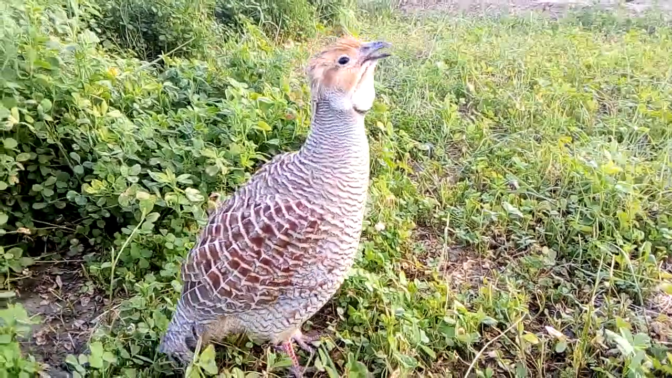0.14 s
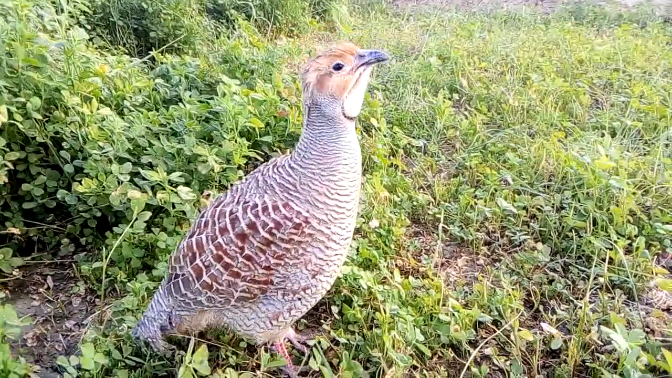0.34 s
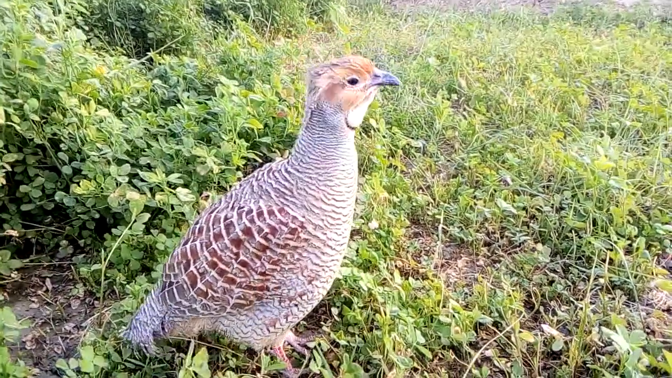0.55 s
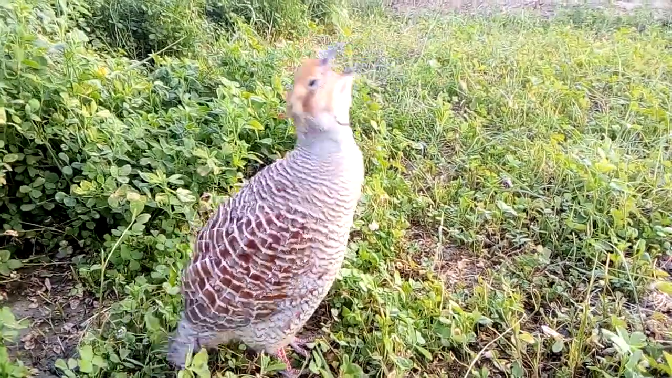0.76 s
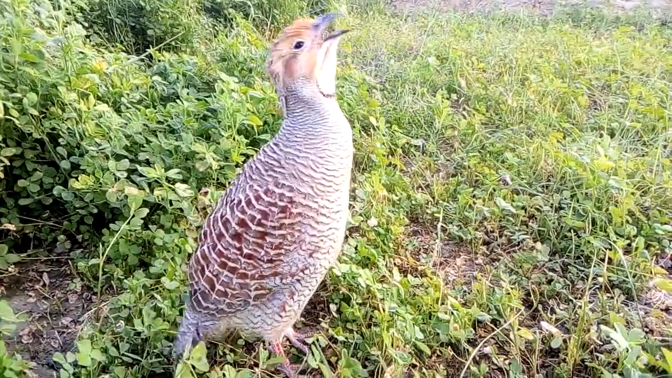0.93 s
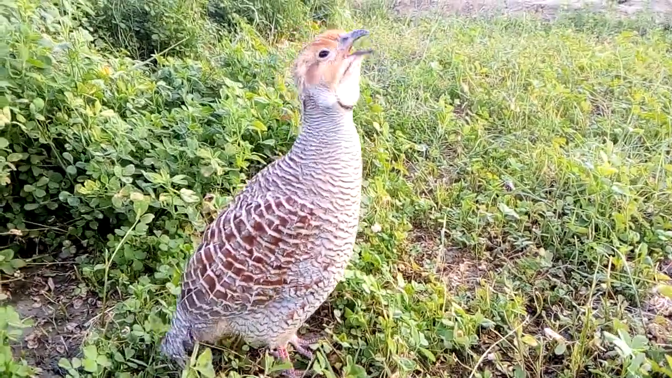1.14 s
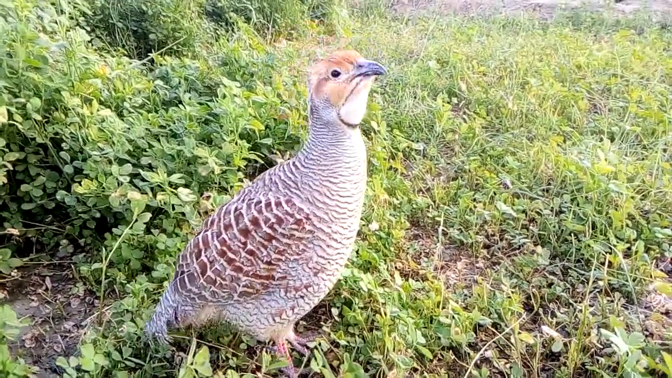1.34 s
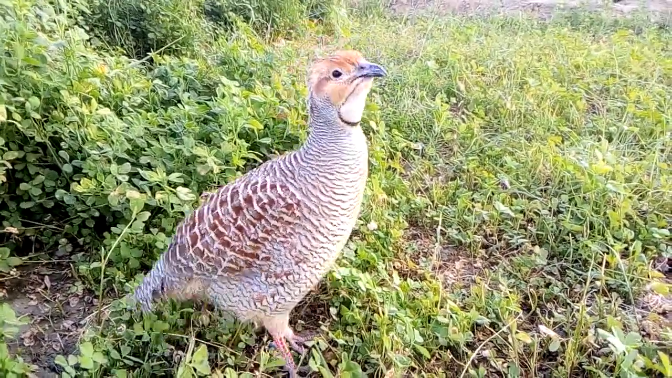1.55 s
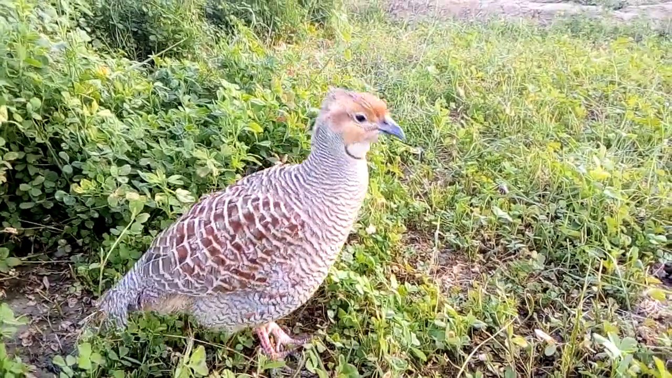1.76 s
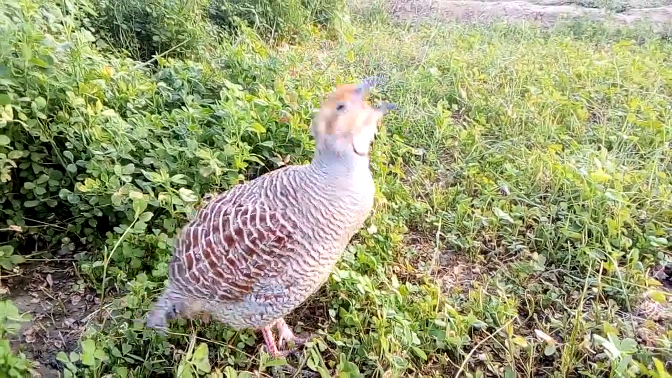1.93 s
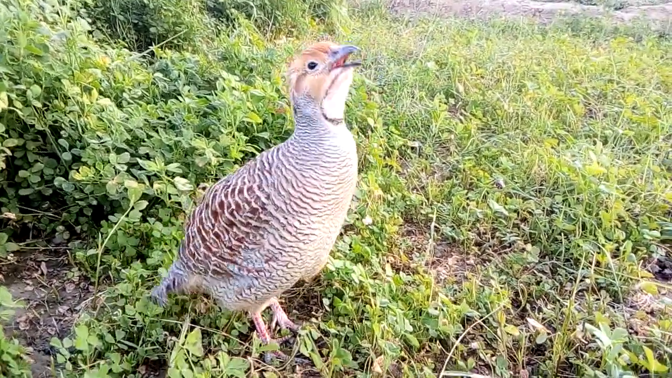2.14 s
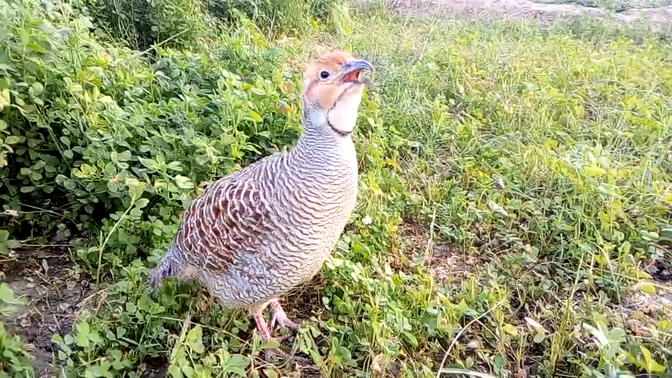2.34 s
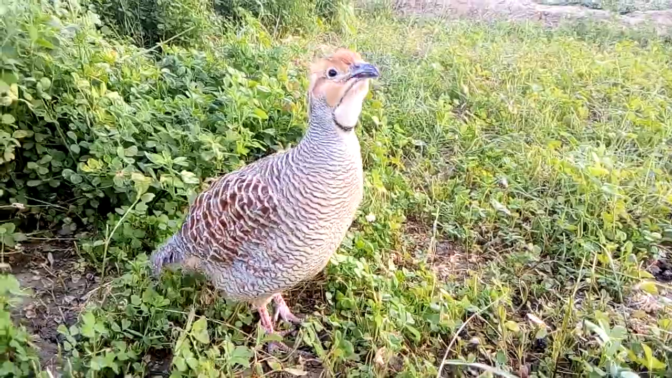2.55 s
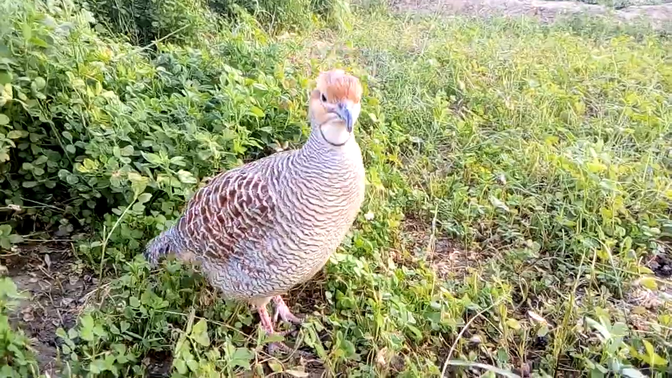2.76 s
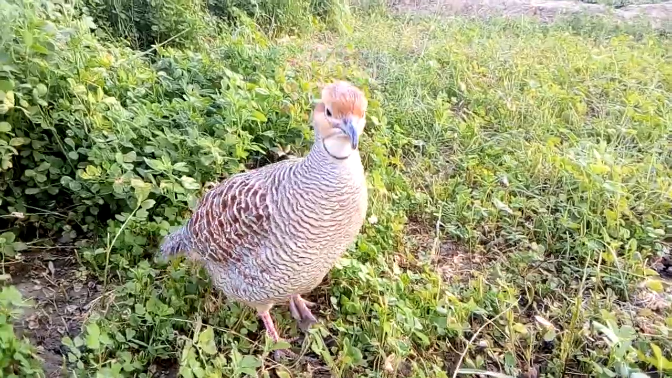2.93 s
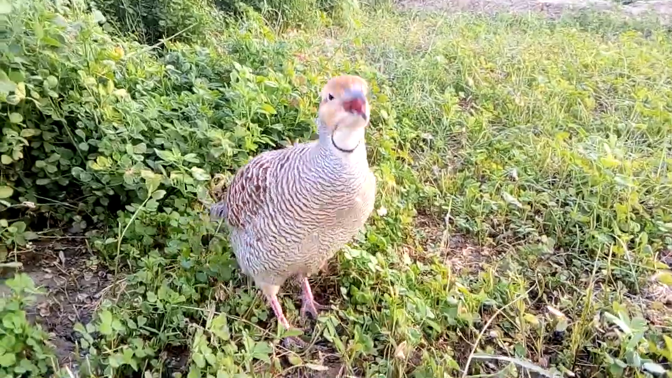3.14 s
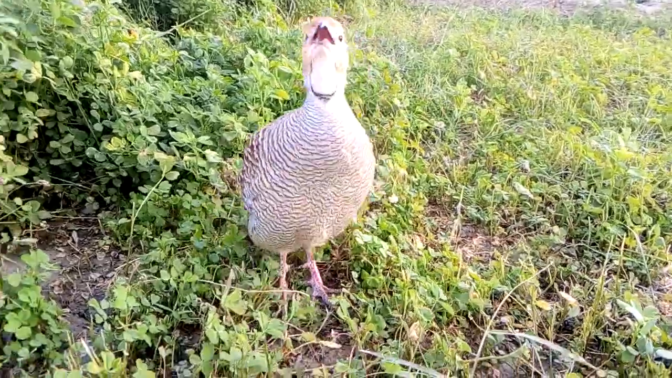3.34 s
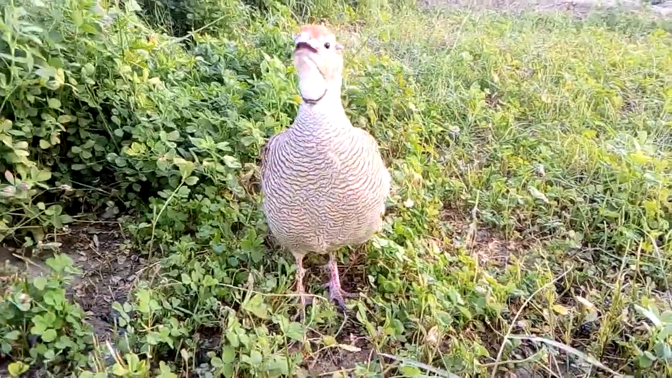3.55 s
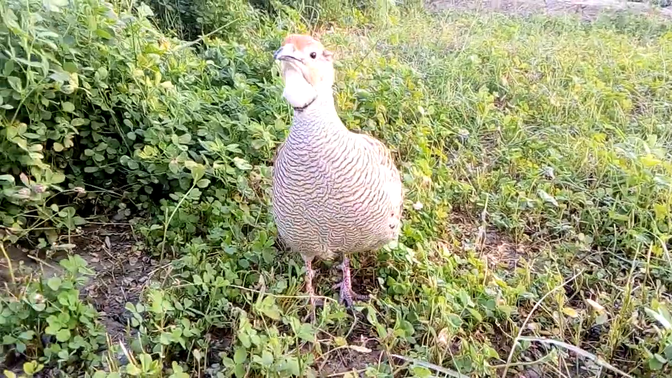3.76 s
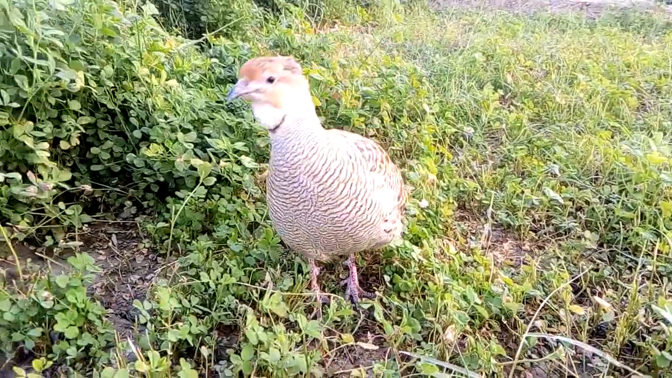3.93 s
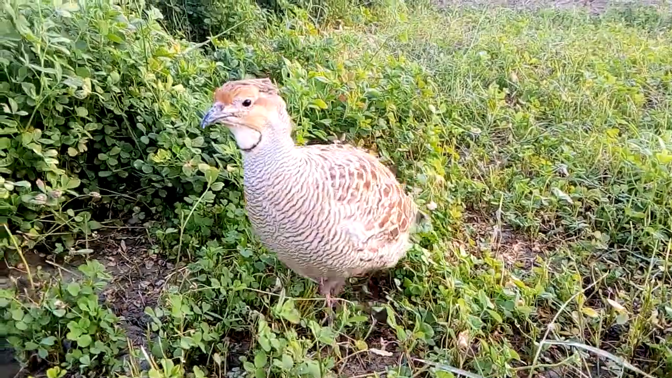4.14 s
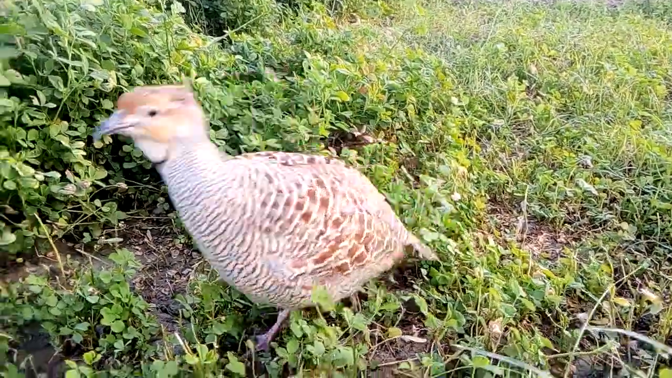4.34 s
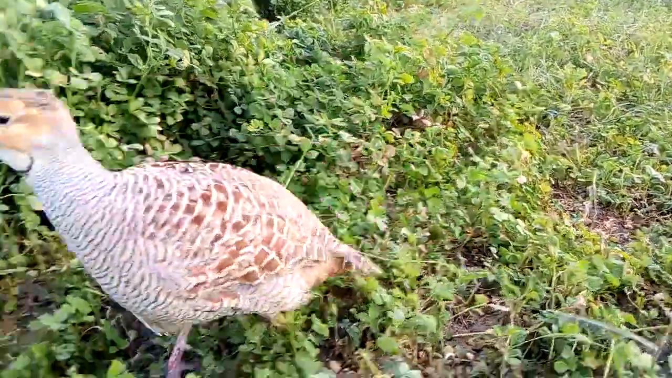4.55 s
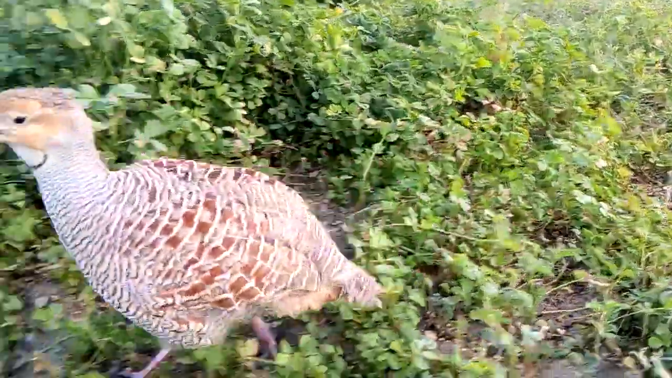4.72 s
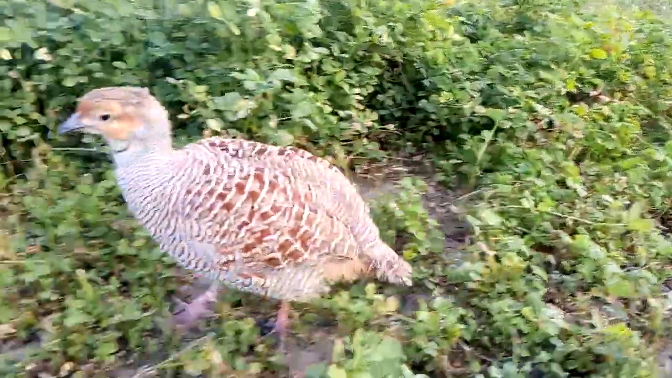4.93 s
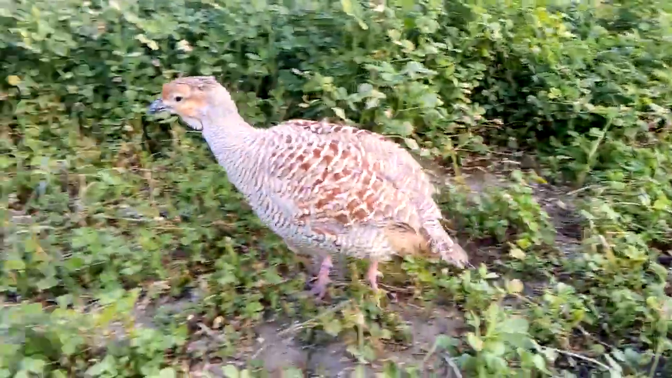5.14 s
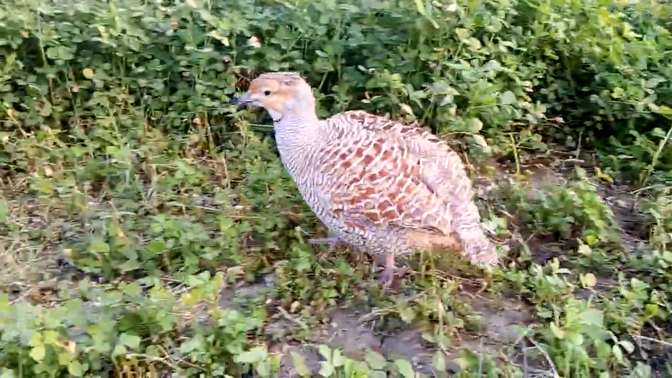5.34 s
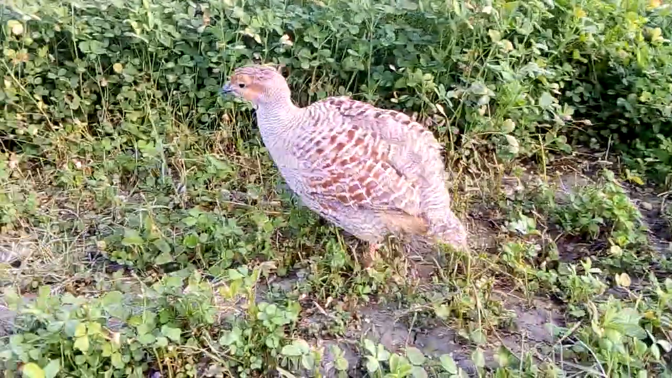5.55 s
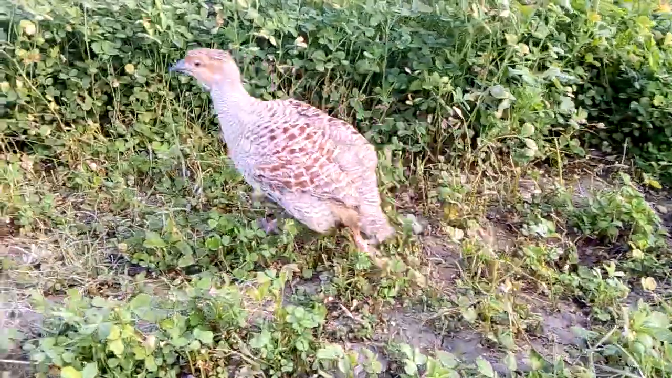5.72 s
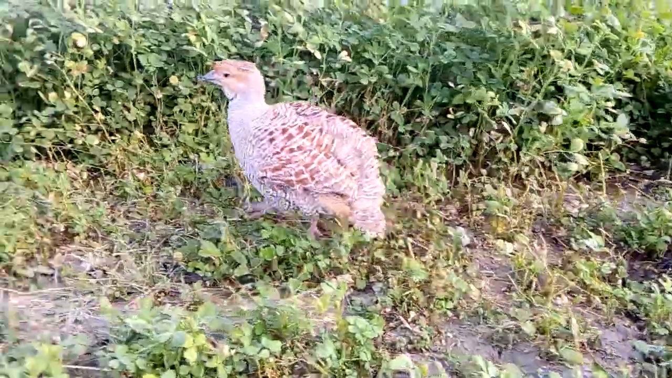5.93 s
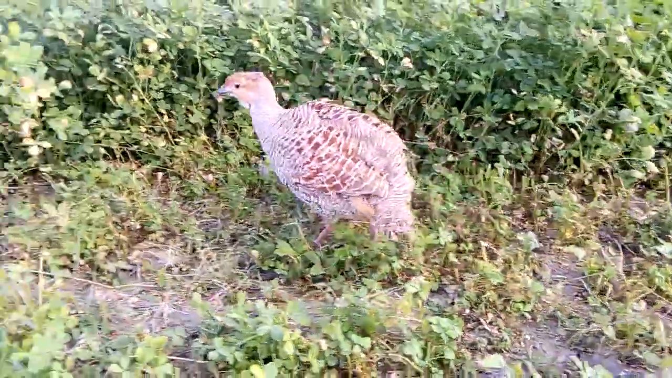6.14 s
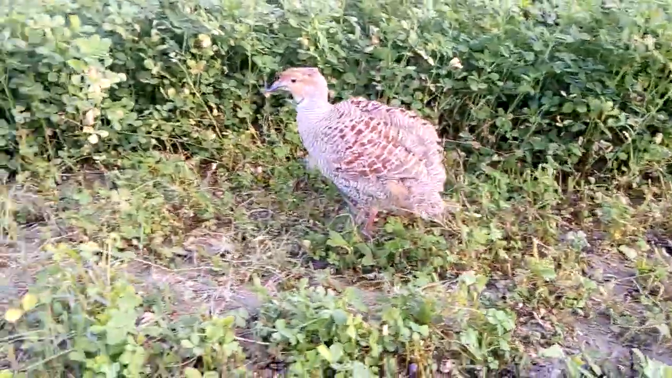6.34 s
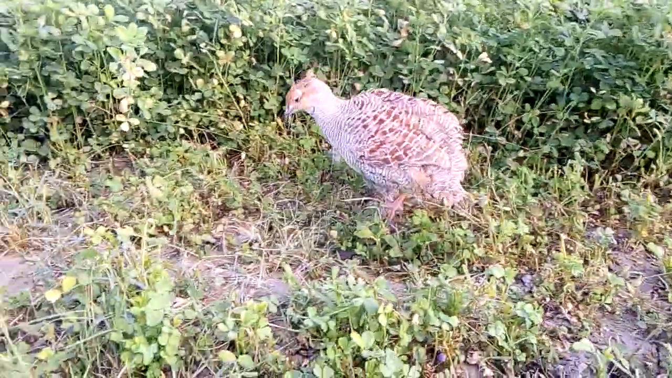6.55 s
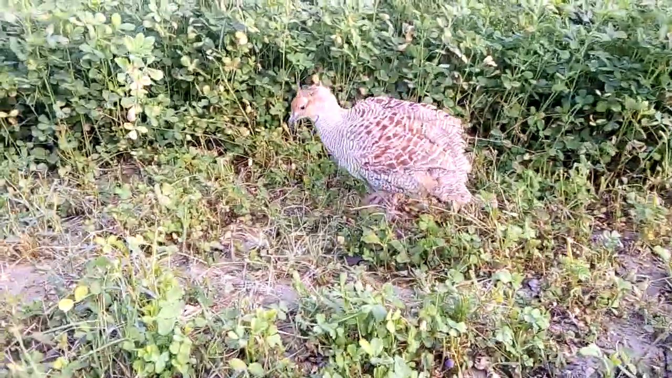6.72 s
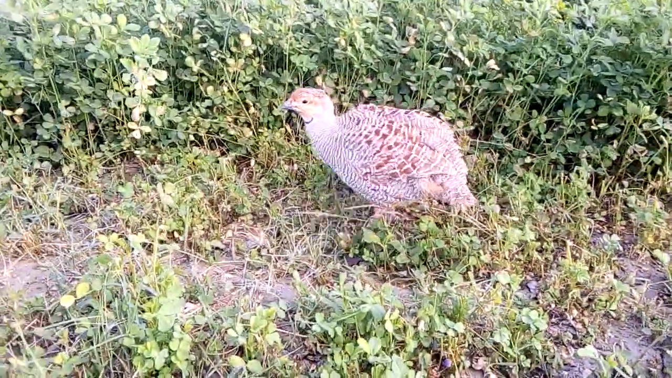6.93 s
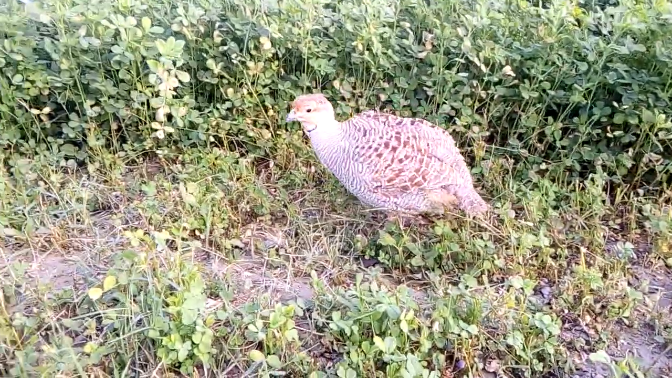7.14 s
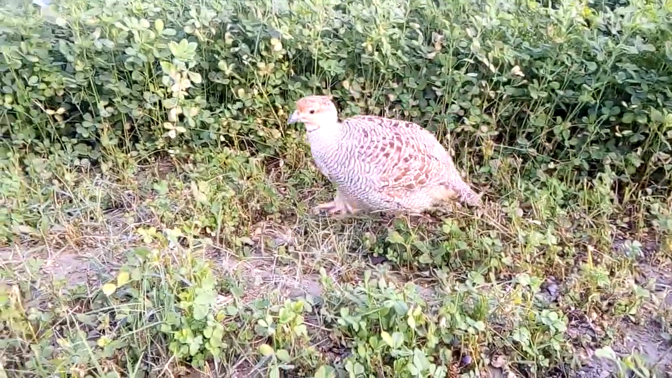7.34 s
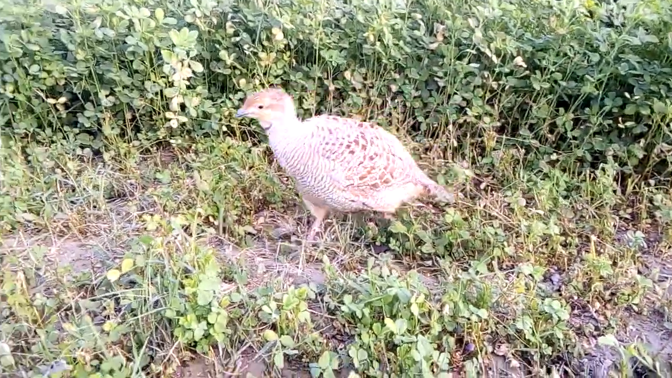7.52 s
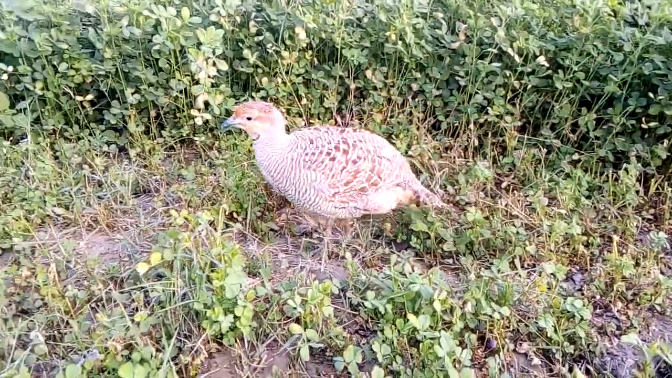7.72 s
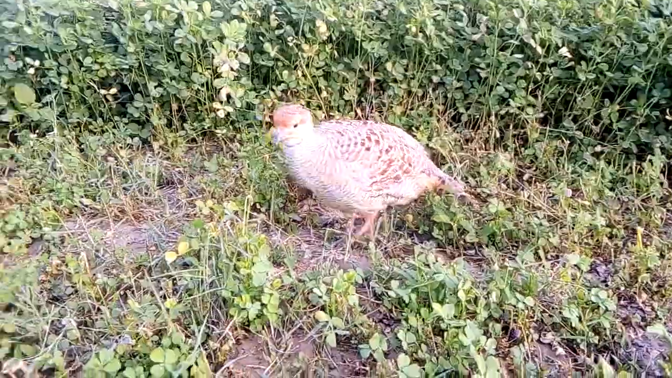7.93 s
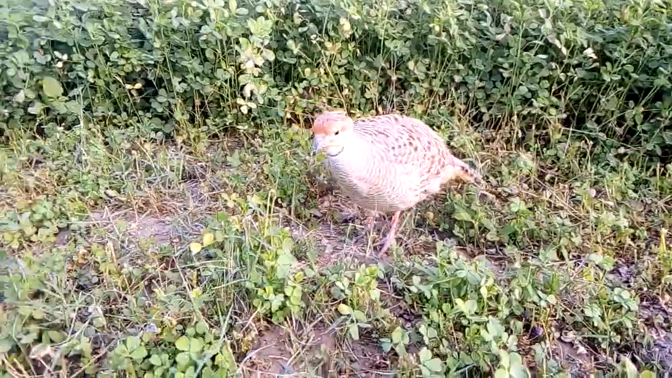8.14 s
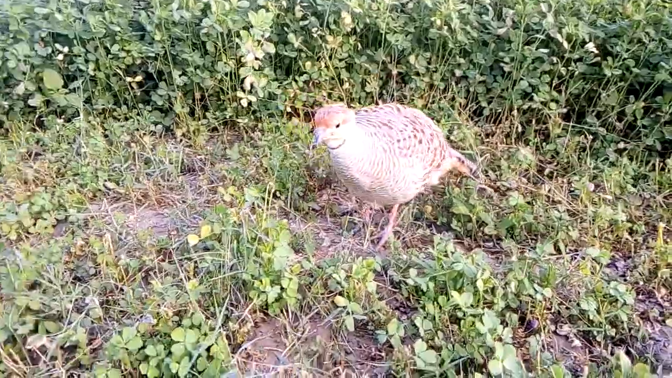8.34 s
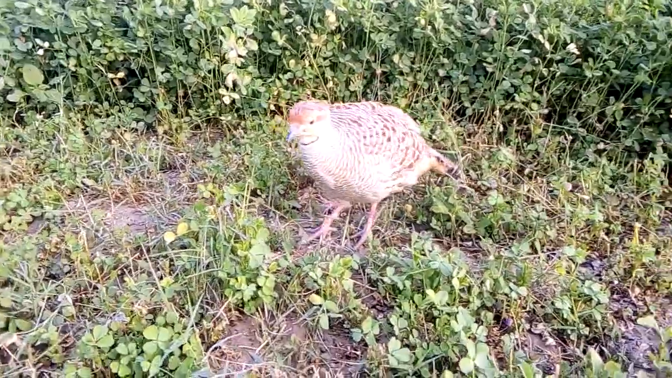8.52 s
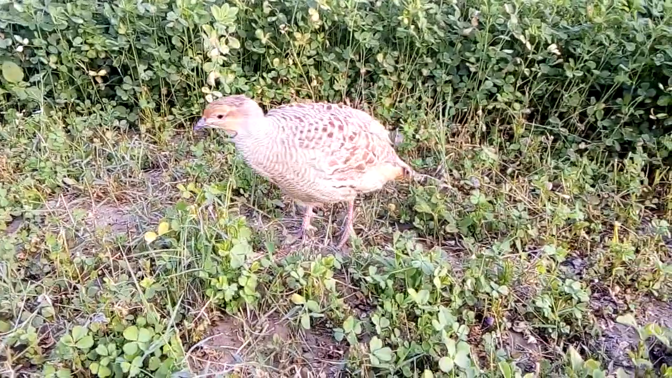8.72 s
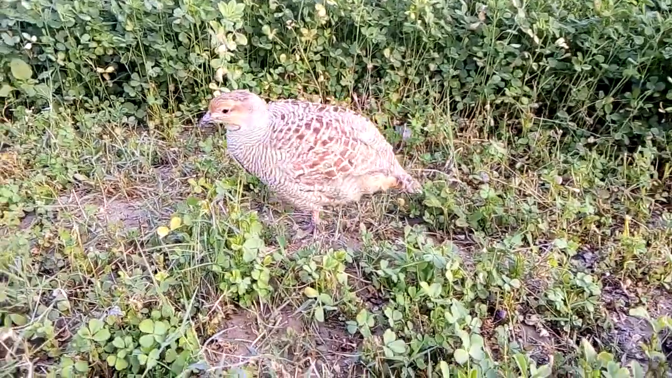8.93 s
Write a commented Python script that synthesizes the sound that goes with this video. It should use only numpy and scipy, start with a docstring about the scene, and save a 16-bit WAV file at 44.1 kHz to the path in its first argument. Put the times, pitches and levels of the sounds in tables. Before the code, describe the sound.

A bird close by gives loud runs of harsh barks, whistles and screeches, then single whistles and soft peeps outdoors.

```python
"""On open ground beside a leafy crop, a far songbird warbles over a faint hush of air.
A grey francolin close by gives four arched barks that lose their force; the field sends back a faint echo.
Three full phrases follow: a breathy whistle, a screech that breaks between rasp and clear tone,
and four more barks, all made by air driven through its voice box (the syrinx).
Then it walks off with single whistles and soft peeps, brushing leaves and snapping stalks."""
import sys
import numpy as np
from scipy import signal
from scipy.fft import rfft, irfft, next_fast_len
from scipy.io import wavfile

SR = 44100
rng = np.random.default_rng(int(sys.argv[2]) if len(sys.argv) > 2 else 0)


def to_wav(s):
    """Save 16-bit WAV."""
    ch = np.atleast_2d(s).T  # columns
    pcm = np.round(np.clip(ch, -1, 1) * 32767)  # PCM
    wavfile.write(sys.argv[1], SR, pcm.astype(np.int16))


N = 400428
CUTOFF_HZ = 15900


def from_db(db):
    """Turn decibels into a number to multiply by."""
    return 10 ** (np.asarray(db) / 20)


def unit_power(x):
    """Scale a signal to an average power of one."""
    return x / np.sqrt(np.mean(x ** 2) + 1e-20)


def along(rows, at):
    """Read a table between its rows, looking up by the first column."""
    first, *columns = np.transpose(rows)
    return [np.interp(at, first, column) for column in columns]


def at_hz(spectrum, hz):
    """Look up the level in dB that a spectrum has at a frequency."""
    f, db = np.transpose(spectrum)
    return np.interp(np.log(np.maximum(hz, 1)), np.log(f), db)


def noise(spectrum, size):
    """Noise of power one; the spectrum sets only its tone colour."""
    padded = next_fast_len(size)
    gain = from_db(at_hz(spectrum, np.fft.rfftfreq(padded, 1 / SR)))
    white = rfft(rng.standard_normal(size), padded)
    return unit_power(irfft(white * gain, padded)[:size])


def wander(rate_hz, size):
    """A smooth random wobble with a typical size of one."""
    steps = np.arange(size) * rate_hz / SR
    return unit_power(np.interp(steps, np.arange(size), rng.standard_normal(size)))


def span(start, end):
    """Sample times between two moments."""
    return np.arange(int(start * SR), int(end * SR)) / SR


def ramp(t, start, length):
    """Rise from zero to one over a stretch of time."""
    return np.clip((t - start) / max(length, 1e-4), 0, 1)


def fade_ends(t, fade_s):
    """A gain that fades in at the start and out at the end."""
    return np.clip(np.minimum(t - t[0], t[-1] - t) / fade_s, 0, 1)


def phase_of(pitch):
    """The running angle of a wave that follows a pitch in Hz."""
    return 2 * np.pi * np.cumsum(pitch) / SR


def add(out, start, sound):
    """Mix a sound in at a time, softening its ends so they do not click."""
    i = max(int(start * SR), 0)
    k = np.arange(len(sound))
    edge = np.minimum(np.minimum(k, k[::-1]) / 40, 1)
    out[i:i + len(sound)] += (sound * edge)[:max(N - i, 0)]


# tone colour of the background air: f/Hz, level/dB
AIR_COLOUR = [(30, -17.5), (70, -6), (130, -3), (200, -7.5), (400, -8), (750, -14.5), (1100, -20),
              (1700, -11), (2700, -14), (3800, -9.5), (6500, -19), (8500, -32), (12000, -42.5),
              (15500, -29.5)]


def open_air():
    """A faint hush whose level drifts a little."""
    return from_db(-62.2 + 1.6 * wander(8, N)) * noise(AIR_COLOUR, N)


# phrases of the far songbird: start t/s, end t/s, highest level/dB
SONG_PHRASES = [(0, .7, -59), (1.55, 1.85, -54.5), (2.2, 3.1, -56), (3.8, 5.6, -66)]


def songbird(low_hz=2800, high_hz=5500, fall=.37, notes_per_s=85, note_s=.016):
    """A hurried warble of tiny notes that each slide down."""
    out = np.zeros(N)
    for start, end, level_db in SONG_PHRASES:
        slots = np.arange(start, end, 1 / notes_per_s)
        for slot, (late, length, height, strength) in zip(slots, rng.random(size=(200, 4))):
            progress = np.linspace(0, 1, int(note_s * (.5 + length) * SR))
            first_hz = low_hz + height * (high_hz - low_hz)
            pitch = first_hz * (1 - fall * np.sin(progress * np.pi / 2))
            swell = strength * from_db(level_db) * np.sin(np.pi * progress)
            add(out, slot + late / notes_per_s, np.sqrt(2) * swell * np.sin(phase_of(pitch)))
    return out


# tone colour of the throat with the beak wide open: f/Hz, level/dB
OPEN_BEAK = [(350, -32), (750, -24), (1200, -5.5), (1800, -5), (2300, 8.5), (2700, -7), (3200, 2.5),
             (4100, 1), (4600, -10.5), (5100, -3), (6200, -1), (8100, -28), (10000, -26), (12000, -47)]


def throat_hiss(effort, size):
    """Before a hard bark, air hisses through the throat until the voice catches."""
    return from_db(-33) * effort ** 4 * np.linspace(0, 1, size) * noise(OPEN_BEAK, size)


def voice_box(pitch, halves, throat_db, count, flutter_db):
    """A tone with fluttering overtones; alternating strong and weak beats add tones halfway between."""
    multiple = np.arange(1, count + 1)[:, None] / 2
    hz = multiple * pitch
    flutter = flutter_db * np.array([wander(130, len(pitch)) for _ in multiple])
    gain = from_db(throat_db(hz) + flutter) * np.where(multiple % 1 > 0, halves, 1) * (hz < CUTOFF_HZ)
    tones = gain * np.cos(multiple * phase_of(pitch) + 2 * np.pi * rng.random((count, 1)))
    return np.sum(tones, axis=0) / np.sqrt(np.sum(gain ** 2, axis=0) / 2 + 1e-12)


# tone colour of the throat with the beak nearly shut: f/Hz, level/dB
SHUT_BEAK = [(200, -38), (330, -15), (520, -15), (760, -19), (1020, -2), (1400, 10), (1750, -7),
             (2200, -23), (2800, -29), (3350, -14), (4400, -34), (5100, -20.5), (6000, -47), (8600, -49),
             (12000, -68)]
# how one bark unfolds: share of its length, share of its top pitch, level/dB,
# then from 0 to 1: beak opening, roughness, halfway tones, share of the higher voice
BARK_SHAPE = [(0, .48, -12, .4, 1.0, .3, 0.04), (.1, .64, -3.5, 0.8, 1, .2, 0.02),
              (.3, .87, 0, 0.97, 0.55, 0.3, 0.01), (.5, 0.97, 0, 0.85, .41, .5, .1),
              (.68, .92, -3, 0.4, .3, 0.8, .95), (.85, .76, -2, .35, .6, .8, 0.85),
              (1, .62, -18, .3, 0.8, .6, 0.4)]
# the barks: start t/s, length t/s, top pitch f/Hz, level/dB, effort from 0 to 1
BARK_CALLS = [(0.032, 0.074, 1307, -16, 1.0), (0.161, 0.077, 1286, -15.5, 0.89),
              (.304, 0.072, 1129, -16.5, 0.7), (.463, 0.067, 770, -18, 0.09),
              (1.079, 0.07, 1293, -16.5, 1.0), (1.205, 0.076, 1205, -16, 0.87),
              (1.344, 0.073, 1113, -17, 0.71), (1.506, 0.069, 827, -18.5, 0.14),
              (2.259, 0.076, 1348, -15.5, 0.99), (2.389, 0.071, 1194, -16.5, 0.87),
              (2.523, 0.064, 1030, -16, 0.6), (2.700, 0.071, 691, -21, 0.06),
              (3.516, 0.075, 1288, -15, 0.98), (3.642, 0.071, 1145, -14.5, 0.79),
              (3.781, 0.074, 885.5, -16.5, 0.32), (3.947, .064, 556, -27.5, 0)]


def barks(jitter=.05, waver=.015, shimmer_db=2, rasp=.55, breath=.07, hiss_lead_s=.025):
    """Pitch arches up and down; effort opens the beak, roughens the voice and flips the fall higher."""
    out = np.zeros(N)
    for start, length, top_hz, level_db, effort in BARK_CALLS:
        lead_in = span(start - hiss_lead_s, start + .0049)
        add(out, lead_in[0], throat_hiss(effort, len(lead_in)))
        t = span(start, start + length)
        size = len(t)
        bend, swell_db, opening, rough, halves, upper = along(BARK_SHAPE, (t - start) / length)
        opening = opening * effort
        upper = np.clip(upper * (2 * effort - .8), 0, .95)
        rough = rough * (.5 + .5 * effort)
        wobble = jitter * rough * wander(900, size) + waver * effort * wander(140, size)
        pitch = top_hz * bend * (1 + wobble)
        throat_db = lambda hz: (1 - opening) * at_hz(SHUT_BEAK, hz) + opening * at_hz(OPEN_BEAK, hz)
        low = voice_box(pitch, halves * effort ** 2, throat_db, count=44, flutter_db=5)
        high = voice_box(1.5 * pitch, 0, throat_db, count=16, flutter_db=5)
        tone = np.sqrt(1 - upper) * low + np.sqrt(upper) * high
        air = unit_power((1 - opening) * noise(SHUT_BEAK, size) + opening ** 2 * noise(OPEN_BEAK, size))
        air_share = np.clip(rasp * rough ** 2 + breath * effort, 0, .95)
        voice = np.sqrt(1 - air_share) * tone + np.sqrt(air_share) * air
        flutter_db = shimmer_db * rough * wander(600, size)
        add(out, start, from_db(level_db + swell_db + flutter_db) * voice)
    return out


# how the echo dies away: delay t/s, relative level/dB
ECHO_FADE = [(.004, 4.5), (.03, 4.5), (.08, -3.5), (.14, -2), (.17, -10.5), (.23, -24), (.45, -36),
             (.8, -50)]
# tone colour of the echo: f/Hz, level/dB
ECHO_TONE = [(300, -4), (1000, -6), (1600, -5), (2300, 4.5), (3000, -4), (4500, 0), (6500, -5), (7400, -4),
             (8300, -16), (15000, -30.5)]


def field_echo(calls, echo_db):
    """Plants and distant bushes scatter the calls back."""
    t = span(0, 1)
    fade_db, = along(ECHO_FADE, t)
    scatter = noise(ECHO_TONE, len(t)) * from_db(fade_db) * (t > ECHO_FADE[0][0])
    return from_db(echo_db) * signal.fftconvolve(calls, scatter / np.linalg.norm(scatter))[:N]


def knocks(rows, band_hz, decay_s):
    """Short contacts that do not ring: each is a burst of noise that dies at once."""
    out, t = np.zeros(N), span(0, .08)
    band = signal.butter(4, band_hz, "band", fs=SR, output="sos")
    for start, peak_db in rows:
        burst = signal.sosfilt(band, rng.standard_normal(len(t)) * np.exp(-t / decay_s))
        add(out, start, from_db(peak_db) * burst / np.abs(burst).max())
    return out


# the bumps: t/s, peak level/dB
LOW_BUMPS = [(0.449, -48), (4.07, -41), (5.663, -40), (7.804, -40), (8.484, -26.5), (8.895, -35)]


def bumps():
    """Soft, low knocks now and then."""
    return knocks(LOW_BUMPS, band_hz=(100, 560), decay_s=.004)


def whistle_shape(t, row, settle_s=.019, break_s=.005):
    """Pitch and level of a whistle: an upward scoop, a break, then a held note that swells and dies."""
    start, crack, release, end, scoop_db, entry_hz, held_hz, last_hz, level_db, swell_s, sag = row
    scoop_hz = entry_hz * (.9 + .32 * ramp(t, start, crack - start))
    opening_db = scoop_db - 20 * (1 - ramp(t, start, min(.014, crack - start)))
    held_s = np.maximum(t - crack, 0)
    closing = ramp(t, release, end - release)
    flick_hz = (last_hz - held_hz) * closing ** 2
    note_hz = held_hz + (entry_hz - held_hz) * np.exp(-held_s / settle_s) + flick_hz
    note_db = level_db - 12 * np.exp(-held_s / swell_s) - sag * held_s - 29 * closing ** 1.6
    broken = ramp(t, crack - break_s / 2, break_s)
    dip_db = 4 * np.exp(-((t - crack) / break_s) ** 2)
    pitch = scoop_hz + broken * (note_hz - scoop_hz)
    return pitch, opening_db + broken * (note_db - opening_db) - dip_db


# tone colour of the air rushing past a whistle: f/Hz, level/dB
BREATH_COLOUR = [(1150, -41), (1480, -8), (2100, -23), (2600, -14.5), (3200, -11), (4200, -2), (5300, -14),
                 (6700, -10.5), (7700, -24), (8700, -37), (11000, -42), (15000, -49)]
# the whistles: start t/s, voice break t/s, fade from t/s, end t/s, scoop level/dB,
# entry f/Hz, held f/Hz, last f/Hz, note level/dB, swell t/s, sag/(dB per s)
WHISTLE_CALLS = [(.662, .675, .787, .801, -27, 2740, 2990, 3020, -14.8, .006, 5),
                 (1.815, 1.838, 1.966, 1.98, -29, 2720, 2905, 2860, -15, .018, 14),
                 (3.055, 3.073, 3.19, 3.236, -26, 2730, 2890, 3500, -14.3, .009, 24),
                 (4.356, 4.386, 4.53, 4.568, -21.5, 2760, 2975, 3950, -7.3, .04, 90),
                 (5.676, 5.686, 5.738, 5.785, -28, 2600, 3370, 3700, -11.5, .007, 55),
                 (5.757, 5.766, 5.846, 5.888, -26, 3700, 3185, 4100, -11.3, .02, 0),
                 (7.813, 7.847, 7.983, 8.05, -16.5, 2800, 2975, 4300, -11.6, .045, 0),
                 (8.898, 8.921, 9.075, 9.08, -20, 2600, 2900, 2930, -12, .017, 40)]


def whistles(full_db=-15, octave_db=-28.5, air_db=-38, waver_hz=110):
    """An almost pure tone in rushing air; harder blowing is higher and breathier, weak turns hoarse."""
    out = np.zeros(N)
    for row in WHISTLE_CALLS:
        t = span(row[0], row[3])
        size = len(t)
        pitch, level_db = whistle_shape(t, row)
        pitch = pitch * (1 + .006 * wander(waver_hz, size))
        level_db = level_db + .7 * wander(waver_hz, size)
        weak = np.clip((full_db - level_db) / 15, 0, 1)
        blow_db = .0136 * (np.median(pitch) - 2950)
        jitter = (.005 + .03 * weak ** 2) * wander(2000, size)
        phase = phase_of(pitch * (1 + jitter))
        tone = np.sqrt(2) * (np.sin(phase) + from_db(octave_db + blow_db) * np.sin(2 * phase))
        # swirling air shakes the tone and makes it hoarse
        shake = 1 + from_db(-22 + 16 * weak) * wander(900, size)
        rush_db = air_db + blow_db + .45 * (level_db - full_db)
        air = fade_ends(t, fade_s=.016) * from_db(rush_db) * noise(BREATH_COLOUR, size)
        add(out, t[0], from_db(level_db) * shake * tone + air)
    return out


def screech_shape(t, marks, held_hz=2418, sharp_hz=260, drop_hz=410, flip_s=.005, push_s=.0015):
    """Pitch, level and roughness of a screech: it starts high, settles, then sinks and grows quieter."""
    start, lock, unlock, relock, sunk, _ = marks

    def clear(lead_s):
        """One during the two clear tones, zero during the rasps."""
        return sum(ramp(t, on - lead_s, flip_s) - ramp(t, off - flip_s / 2, flip_s)
                   for on, off in ((lock, unlock), (relock, sunk)))

    sink_hz = drop_hz * (np.maximum(t - relock, 0) / (sunk - relock)) ** 2
    pitch = held_hz + sharp_hz * (1 - ramp(t, start, lock - start)) - sink_hz
    # the rasp before, between and after the clear tones
    rasp_db = np.select([t < (lock + unlock) / 2, t < (relock + sunk) / 2], [-16.5, -24.5], -25.5)
    clear_db = -10.2 - .026 * sink_hz
    pushed = clear(flip_s / 4 + push_s)  # a push of air comes just before each clear tone
    fade_in_db = -12 * (1 - ramp(t, start, .008))
    level_db = (1 - pushed) * rasp_db + pushed * clear_db + fade_in_db
    rough = np.clip(1 - .94 * clear(flip_s / 4), 0, 1)
    return pitch, level_db, rough


# tone colour of the screeching throat: f/Hz, level/dB
SCREECH_COLOUR = [(500, -36), (1250, -6), (1750, -7.5), (2400, 0), (3600, 0.5), (4100, -8), (4850, 0),
                  (6300, -2.5), (7300, -11.5), (8200, -28), (10800, -45), (12100, -39), (13300, -53),
                  (14600, -28), (16000, -46)]
# the screeches: start t/s, first clear tone from t/s, to t/s, second from t/s, to t/s,
# end t/s, microphone thump level/dB
SCREECH_CALLS = [(0.793, 0.838, .861, .881, .950, .970, -59.5),
                 (1.978, 2.025, 2.045, 2.070, 2.133, 2.156, -48.5),
                 (3.239, 3.289, 3.310, 3.332, 3.387, 3.411, -38)]


def screeches(jitter=.045, rasp=.61, shimmer_db=2.4):
    """Driven hardest, the voice box flips between rasp and piercing tone."""
    out = np.zeros(N)
    throat_db = lambda hz: at_hz(SCREECH_COLOUR, hz)
    for *marks, thump_db in SCREECH_CALLS:
        t = span(marks[0], marks[-1])
        size = len(t)
        pitch, level_db, rough = screech_shape(t, marks)
        pitch = pitch * (1 + jitter * rough * wander(900, size))
        halves = .038 + .8 * rough ** 2
        tone = voice_box(pitch, halves, throat_db, count=16, flutter_db=2 + 1.4 * rough)
        air_gain = rasp * rough
        flutter_db = shimmer_db * rough * wander(450, size)
        voice = np.sqrt(1 - air_gain ** 2) * tone + air_gain * noise(SCREECH_COLOUR, size)
        add(out, marks[0], from_db(level_db + flutter_db) * voice)
        # at the loudest moment the overloaded microphone adds a low thump
        thump = noise([(30, -21), (80, 1.5), (160, -.5), (300, -18.5), (1500, -60)], size)
        stage = np.interp(t, marks, np.arange(len(marks)))  # 1.5 is midway through the first clear tone
        add(out, marks[0], from_db(thump_db - 12 * np.abs(stage - 1.5)) * thump)
    return out


# stalks snapping: t/s, relative peak level/dB
STALK_SNAPS = [(2.6738, -47), (4.0238, -44), (5.3837, -44), (6.5635, -25), (6.8174, -37), (7.673, -42),
               (8.15, -44)]


def snapping_stalks():
    """Each stalk breaks with a short, bright click."""
    return from_db(-2) * knocks(STALK_SNAPS, band_hz=(2000, 5500), decay_s=.0036)


def movements(rows, attack_s=.05):
    """The gain of overlapping movements that each swell quickly and die away."""
    t = np.arange(N) / SR
    power = np.zeros(N)
    for peak_s, decay_s, level_db in rows:
        distance = np.maximum((peak_s - t) / attack_s, (t - peak_s) / decay_s)
        power += (from_db(level_db) * np.exp(-np.minimum(distance, 20))) ** 2
    return np.sqrt(power)


# foot shuffles: peak t/s, dying away t/s, level/dB
FOOT_SHUFFLES = [(2.78, .14, -53.5), (3.04, .06, -55), (4.08, .1, -60), (5.7, .05, -58), (7.84, .06, -61),
                 (8.15, .12, -62), (8.9, .06, -57)]
# tone colour of scuffed soil: f/Hz, level/dB
SOIL_COLOUR = [(40, -18), (110, -4), (200, -2), (330, 0), (550, -8), (900, -24), (2000, -45)]


def shuffling_feet():
    """The bird's feet scuff the soil in dull puffs of noise."""
    return movements(FOOT_SHUFFLES) * noise(SOIL_COLOUR, N)


# brushes against the weeds: peak t/s, dying away t/s, relative level/dB
LEAF_BRUSHES = [(2.81, .04, -53), (2.92, .03, -53), (3.03, .04, -53), (4.08, .15, -61), (4.68, .1, -62),
                (5.42, .12, -65), (6.04, .25, -58), (6.42, .12, -60), (6.6, .25, -50), (6.8, .25, -53),
                (7.2, .08, -62), (7.62, .15, -61), (7.9, .12, -56), (8.16, .06, -60), (8.38, .2, -56),
                (8.53, .2, -56.5)]
# tone colour of the leaves: f/Hz, level/dB
LEAF_COLOUR = [(200, -2), (900, -9), (1800, -2), (4200, 0.5), (5500, -4), (7000, -4), (8000, -14),
               (9500, -23), (13500, -38), (15500, -13)]


def rustling_leaves(grain_hz=250, clump_hz=35):
    """Leaves crinkle in clumps as the bird brushes through them."""
    crinkle_db = 1.7 + 2.5 * wander(grain_hz, N) + 2 * wander(clump_hz, N)
    return from_db(crinkle_db) * movements(LEAF_BRUSHES) * noise(LEAF_COLOUR, N)


# the peeps: start t/s, top t/s, end t/s, first f/Hz, top f/Hz, low f/Hz, fall t/s,
# closing lift f/Hz, relative level/dB, fade/dB, overtone level/dB
PEEP_CALLS = [(4.86, 4.872, 4.898, 1340, 1410, 1200, .018, 0, -38.5, 1, -12),
              (4.89, 4.915, 5.003, 1220, 1536, 900, .043, 0, -34, 14, -12),
              (5.163, 5.2, 5.3, 1470, 1720, 1000, .06, 0, -33, 21, -22),
              (6.098, 6.105, 6.132, 1070, 1080, 990, .015, 0, -52, 1, -8),
              (6.127, 6.141, 6.253, 1050, 1540, 895, .034, 0, -43, 12, -8),
              (6.425, 6.46, 6.535, 1640, 1750, 1050, .052, 0, -45.5, 18, -14),
              (7.09, 7.107, 7.245, 1250, 1558, 935, .027, 400, -52.5, 3, -2.5),
              (7.402, 7.425, 7.558, 1934, 2236, 1220, .057, 260, -47.5, 6, -2),
              (7.725, 7.745, 7.815, 1605, 1874, 1200, .055, 0, -47, 5, -6.5),
              (8.728, 8.75, 8.885, 1790, 1890, 980, .056, 0, -43, 11, -6)]


def peeps(gain_db=-1, shimmer_db=1.8, waver_hz=90, lift_s=.028):
    """Quiet notes with the beak shut, pure or reedy: a quick rise, then a fall that fades as it sinks."""
    out = np.zeros(N)
    for row in PEEP_CALLS:
        start, top, end, first_hz, top_hz, low_hz, fall_s, lift_hz, top_db, fade_db, reedy_db = row
        t = span(start, end)
        size = len(t)
        rising = (1 - ramp(t, start, top - start)) ** 2
        fallen = 1 - np.exp(-(np.maximum(t - top, 0) / fall_s) ** 1.7)
        lifted = ramp(t, end - lift_s, lift_s) ** 2
        pitch = top_hz + (first_hz - top_hz) * rising + (low_hz - top_hz) * fallen + lift_hz * lifted
        wobble = .013 * wander(710, size) + .008 * wander(waver_hz, size)
        phase = phase_of(pitch * (1 + wobble))
        overtones = np.sin(2 * phase) + from_db(reedy_db / 2 - 9) * np.sin(3 * phase)
        tone = np.sin(phase) + from_db(reedy_db + 3 * wander(waver_hz, size)) * overtones
        level_db = gain_db + top_db - 9 * rising - fade_db * fallen + shimmer_db * wander(150, size)
        add(out, t[0], np.sqrt(2) * from_db(level_db) * fade_ends(t, fade_s=.009) * tone)
    return out


def scene():
    """Mix the background, the francolin's calls, their echo and the small noises into one channel."""
    background = open_air() + songbird()
    bark, thin_calls, screech = barks(), whistles() + peeps(), screeches()
    echo = field_echo(bark, -31) + field_echo(thin_calls, -34.3) + field_echo(screech, -26)
    small_noises = bumps() + snapping_stalks() + shuffling_feet() + rustling_leaves()
    return (background + bark + thin_calls + screech + echo + small_noises)[None]


def record(dry):
    """Cut away the very highest treble."""
    return signal.sosfilt(signal.ellip(10, .1, 80, CUTOFF_HZ, fs=SR, output="sos"), dry)


dry = scene()
out = record(dry)
to_wav(out)
```